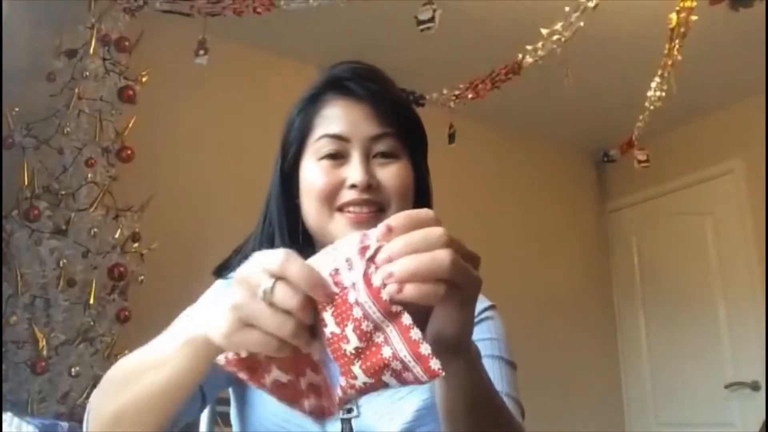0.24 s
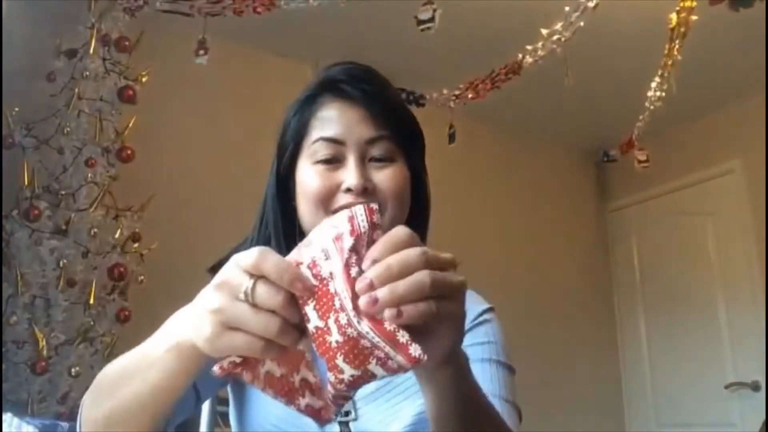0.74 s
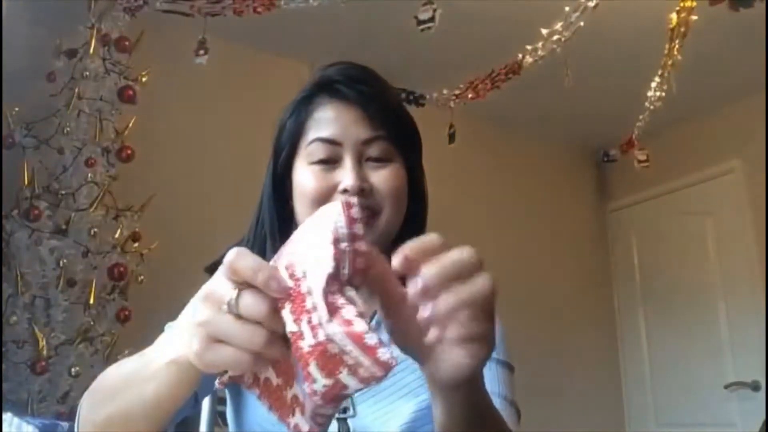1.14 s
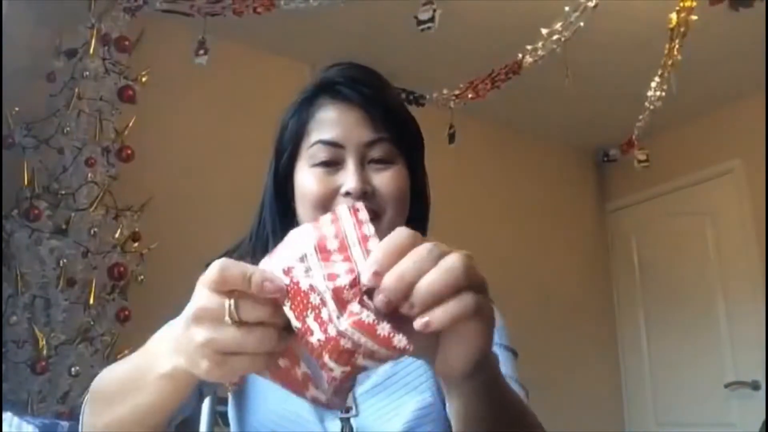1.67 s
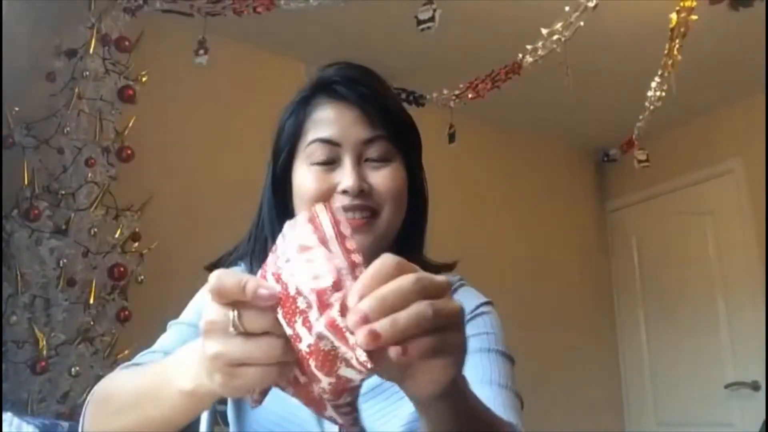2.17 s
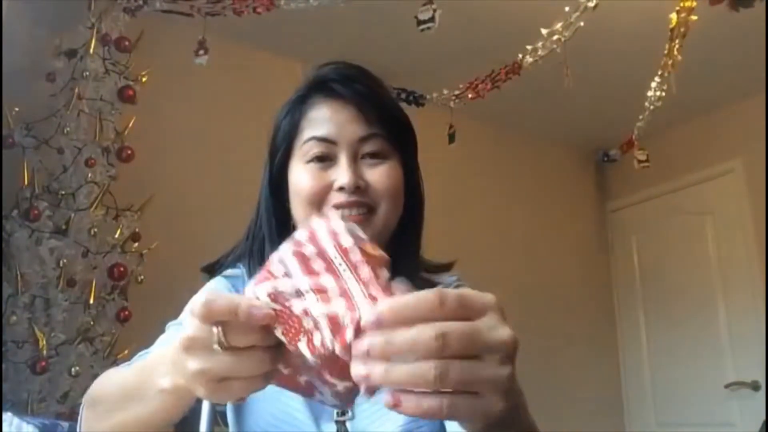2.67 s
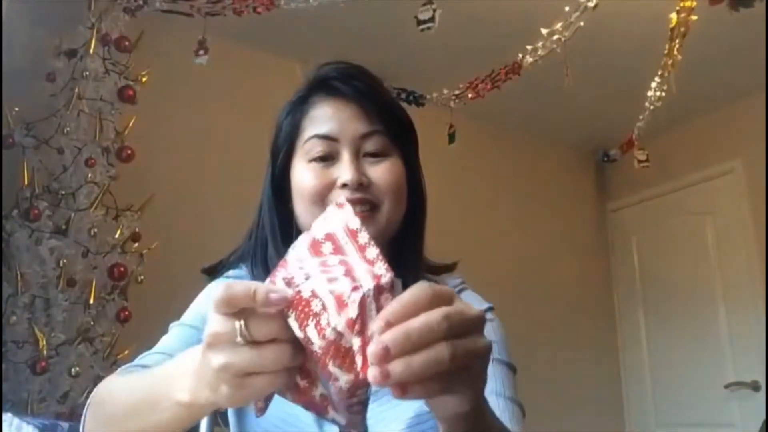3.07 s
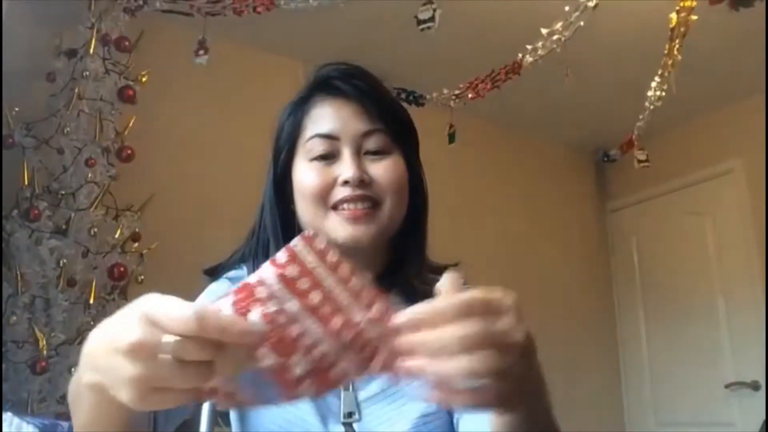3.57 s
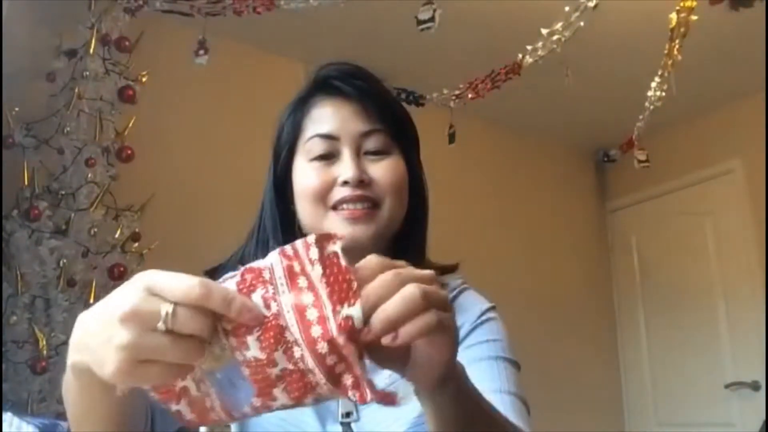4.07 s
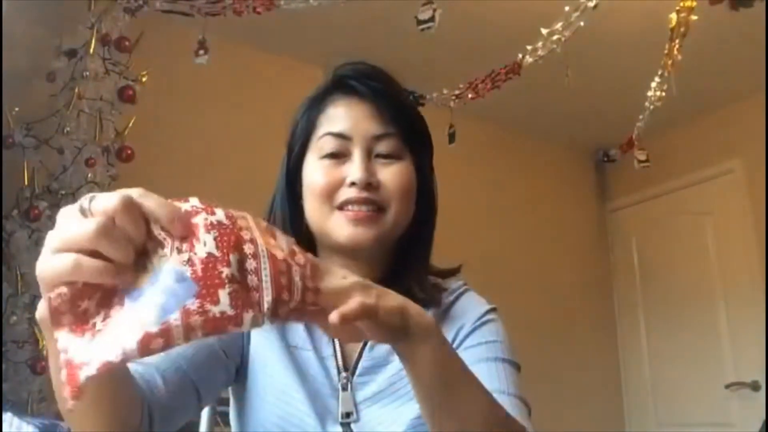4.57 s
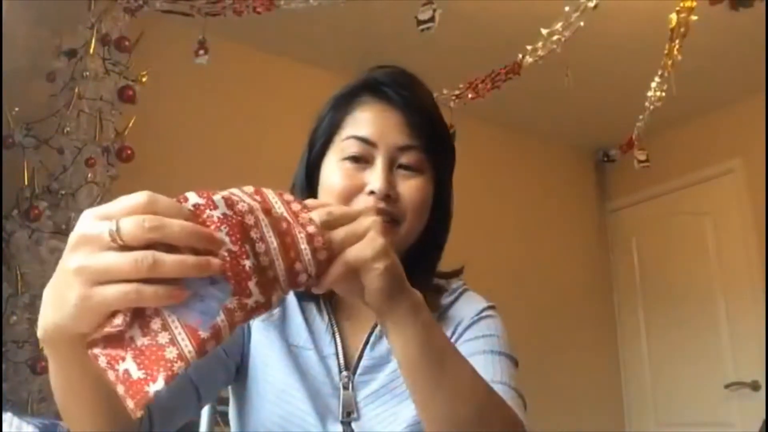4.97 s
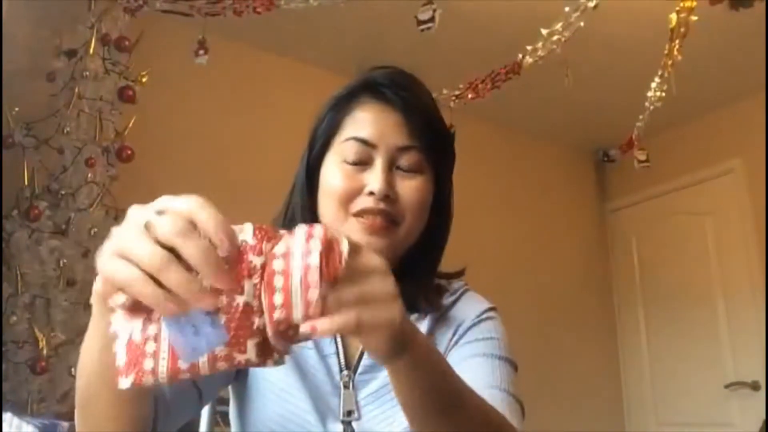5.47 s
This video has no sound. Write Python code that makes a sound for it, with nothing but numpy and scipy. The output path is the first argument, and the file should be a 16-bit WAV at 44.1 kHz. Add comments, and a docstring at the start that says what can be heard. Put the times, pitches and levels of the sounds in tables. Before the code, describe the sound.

Hands pick at, crinkle and briefly tear the wrapping paper of a small soft parcel, close up in a quiet living room.

```python
"""In a living room, close to a phone, two hands pick at, crinkle and rip the wrapping paper of a small soft parcel.
Creases buckle with single snaps and torn fibres go off in quick runs: each is a short push on a damped resonance.
Sliding paper is a dense crackle of tiny slips that follows the hands, with small crinkles popping at random.
Fingers bump the parcel with dull thuds; the walls add echoes and a short tail over a quiet background hush."""
import sys
import numpy as np
from scipy import signal
from scipy.fft import rfft, irfft
from scipy.io import wavfile
from scipy.ndimage import uniform_filter1d

SR = 44100
rng = np.random.default_rng(int(sys.argv[2]) if len(sys.argv) > 2 else 0)


def output_pcm(signal):
    """Save a mono or channel-first signal as 16-bit PCM at the path in sys.argv[1].

    Samples are clipped to [-1, 1] before scaling.
    """
    pcm = np.clip(np.atleast_2d(signal).T, -1, 1) * 32767
    wavfile.write(sys.argv[1], SR, np.round(pcm).astype(np.int16))


N = 252252
T = np.arange(N) / SR
LEAD_S = .003  # a crease starts to creak this long before it gives


# creases that buckle with a clear snap, levels relative to each other:
# (t/s, energy level/dB, f/Hz of the facet, the patch of paper that flips)
CREASE_SNAPS = [(0.0644, -27, 1930), (0.1967, -15, 3670), (0.3525, -4.5, 2720), (0.483, -16, 1460),
                (0.5226, -14, 3440), (0.5476, -14, 2350), (0.591, -20.5, 1310), (0.6082, -18.5, 1860),
                (0.6746, -23.5, 1950), (0.7756, -8, 2130), (0.7884, -13.5, 2000), (0.8523, -14, 2360),
                (0.879, -7.5, 2070), (0.9392, -10, 2220), (0.958, -6.5, 1960), (0.985, -7.5, 1790),
                (1.0458, -10.5, 2420), (1.115, -18.5, 1170), (1.1686, -17, 830), (1.2114, -13.5, 1180),
                (1.255, -11, 2860), (1.2849, -11, 1590), (1.3982, -23, 1340), (1.4807, -9.5, 1910),
                (1.492, -11, 3300), (1.5163, -9, 2210), (1.5887, -18, 2240), (1.6347, -2.5, 3280),
                (1.6624, -0.5, 3870), (1.6659, -2.5, 3500), (1.6867, 2.5, 2670), (1.803, 2.5, 3230),
                (2.0468, -6.5, 1820), (2.177, -13, 1210), (2.1865, -11, 1330), (2.221, -9.5, 1230),
                (2.3346, -14, 1500), (2.3636, -0.5, 2380), (2.3785, -6.5, 2200), (2.4068, -3.5, 2680),
                (2.461, -5, 2660), (2.5171, 1, 2630), (2.5493, -6, 2260), (2.5943, -12, 1050),
                (2.628, -11, 1190), (2.6669, -12.5, 2270), (2.7383, -10, 1940), (2.8036, -6, 2700),
                (2.9331, -3, 1836), (3.1603, -24.5, 1400), (3.2897, -21, 1730), (3.314, -10, 1600),
                (3.3379, -3, 2070), (3.3613, 6.5, 3130), (3.4597, -4.5, 2710), (3.5107, -8.5, 2310),
                (3.5688, -4.5, 2510), (3.6072, -7.5, 3020), (3.7204, -15.5, 2600), (3.7428, -14, 6400),
                (3.8772, -21, 4090), (4.0659, -24, 4180), (4.145, -15, 1940), (4.236, -19, 1740),
                (4.2504, -8.5, 3780), (4.375, -7.5, 3970), (4.4176, 1, 1780), (4.518, -11.5, 1420),
                (4.5586, -5, 2100), (4.579, -8.5, 1170), (4.6575, -2.5, 2360), (4.7289, -8, 2870),
                (4.823, -18, 2220), (4.968, -6, 1490), (5.0867, -20, 1580), (5.1683, -17.5, 1300),
                (5.3426, -7.5, 1430), (5.383, -11.5, 2150), (5.395, -8.5, 2160), (5.5131, -4.5, 1600),
                (5.5665, -9, 1690), (5.6069, -12.5, 1750)]


def snaps(q=1.42, tick=0.61, size=700):
    """Buckling creases: each one lets go with a clear single snap."""
    out = np.zeros(N)
    noises = rng.standard_normal((len(CREASE_SNAPS), size))
    for (s, db, hz), noise in zip(CREASE_SNAPS, noises):
        add(out, s - LEAD_S, undb(db) * snap(hz, noise, q, tick))
    return out


# rips running through the sheet, levels relative to each other:
# (start t/s, length t/s, energy level/dB of a breaking fibre at the start, middle f/Hz)
RIP_RUNS = [(0.323, 0.036, -6.5, 2010), (1.6964, 0.042, 5, 3630), (2.482, .025, -3, 2580),
            (3.363, 0.031, 3.5, 2930)]


def rips(q=1.5, tick=0.48, uneven=0.28, scatter_db=2, octaves=0.18, count=24, size=700):
    """A rip is a quick, nearly regular run of fibres snapping one after another."""
    # fibres break faster as a rip gathers speed, and more weakly as the tension goes
    fibres_per_s, speed_up_per_s2, slacken_db = 260, 3000, 9
    out = np.zeros(N)
    noises = rng.standard_normal((len(RIP_RUNS), count, size))
    for (start, length, db, hz), fibres in zip(RIP_RUNS, noises):
        age = 0  # seconds since the rip began
        for noise in fibres:
            if age > length:
                break
            strength = undb(db - slacken_db * age / length + scatter_db * noise[0])
            fibre_hz = hz * 2 ** (octaves * noise[1])
            add(out, start + age - LEAD_S, strength * snap(fibre_hz, noise[3:], q, tick))
            age += np.exp(uneven * noise[2]) / (fibres_per_s + speed_up_per_s2 * age)
    return out


# how strongly the sheet sends out each pitch of a snap: (f/Hz, level/dB)
SHEET_RADIATION = [(60, -23), (250, 3.5), (450, 6.5), (1200, 3.5), (2200, -2), (4200, -2.5), (5800, -6.5),
                   (8000, -2), (8700, -9.5), (15500, 3)]


def snap(hz, noise, q, tick, shiver_db=-1, shiver_s=0.0012, creak_db=-10, creak_s=0.0015, reach=4.16):
    """A crease creaks for an instant, then flips one facet; the sheet around it shivers for a few milliseconds."""
    t = np.arange(len(noise)) / SR - LEAD_S  # zero at the flip
    after = np.maximum(t, 0)
    shiver = unit(noise * after ** .5 * np.exp(-after / shiver_s))
    creak = unit(noise * np.exp(-abs(t) / creak_s))
    push = undb(shiver_db) * shiver + undb(creak_db) * creak
    push[np.argmin(abs(t))] += 1  # the flip itself
    ring = facet(push, hz, q)
    # big, low facets flip slowly and give little treble
    soft = signal.lfilter(*signal.butter(2, min(reach * hz, SR / 2 - 1), fs=SR), ring)
    return unit(colour((1 - tick) * soft + tick * ring, SHEET_RADIATION))


# relative colour of the sliding sheet, before its three bands are levelled: (f/Hz, level/dB per Hz)
PAPER_COLOUR = [(40, -26.5), (90, -5.5), (180, -0.5), (260, -6), (400, -1.5), (580, -6), (850, -0.5),
                (1500, -3.5), (2500, -3.5), (4000, -8.5), (5800, -15), (8000, -17), (8700, -24),
                (15500, -20.5)]


def rustle(body_db=-3.0, crisp_db=-1, flex_db=-2):
    """Crackle follows the hands; taut paper sounds crisp, and slack paper flexes with a low flutter."""
    flex, body, crisp = hands()
    sheet = colour(crackle(), PAPER_COLOUR)
    edges = [(35, 450), (450, 4500), (4500, 17000)]  # Hz: flexing bass, body, crisp treble
    levels = [flex + flex_db, body + body_db, crisp + crisp_db]
    sliding = np.zeros(N)
    for (lo, hi), db in zip(edges, levels):
        sliding += unit(band(sheet, lo, hi)) * undb(db)
    return np.sqrt(N) * sliding + crinkles(body)


# moves of the hands that slide and crumple the paper, before the fixed trims in rustle():
# (peak t/s, body level/dB, rise t/s, fall t/s, crisp treble level/dB and flexing bass level/dB above the body)
HAND_STROKES = [(0.02, -40.5, 0.14, 0.19, -14.5, -14), (0.287, -27, 0.025, 0.054, -10.5, -15.5),
                (0.346, -29.5, 0.035, 0.016, -2.5, -13), (0.42, -45.5, .05, 0.15, -31, -14),
                (0.55, -44.5, 0.025, 0.048, -37, -16), (0.778, -44.5, 0.047, 0.15, -7, -9),
                (0.996, -29, 0.04, 0.047, -13, -22), (1.21, -47, 0.076, 0.047, -18, -6),
                (1.288, -35.5, 0.026, 0.013, -5, -20), (1.478, -31, 0.012, 0.033, -11, -13.5),
                (1.57, -45.5, 0.055, 0.21, -8, -7.5), (1.722, -17, 0.033, 0.032, -4.5, -18.5),
                (1.812, -28.5, 0.041, 0.058, -26, -24.5), (2.041, -36, 0.043, 0.019, -11, -8),
                (2.183, -32.5, 0.005, 0.012, -9, -14.5), (2.232, -35, 0.032, .045, -18, -15),
                (2.40, -25, 0.034, 0.019, -6.5, -20), (2.497, -20.5, 0.038, 0.026, -6, -21.5),
                (2.68, -40, 0.093, 0.074, -1, -19), (2.80, -30.5, 0.01, 0.0092, 1.5, -18),
                (2.935, -35.5, .04, .025, -8.5, -7), (3.205, -43.5, 0.053, .05, -9.5, -9),
                (3.335, -21, 0.011, 0.06, -7, -30), (3.376, -23.5, 0.028, 0.034, 0, -9),
                (3.472, -30, 0.048, 0.036, -6.5, -25), (3.596, -35.5, 0.061, 0.063, -2.5, -17),
                (3.75, -41.5, 0.02, 0.048, -4.5, -16), (3.82, -59, 0.042, 0.1, -27, -7),
                (4.113, -41, 0.0078, 0.047, -12, -11), (4.249, -38, 0.074, 0.07, -6.5, -11),
                (4.418, -27, 0.034, 0.02, -10, -10), (4.514, -31.5, 0.026, 0.039, -7, -13),
                (4.59, -29.5, 0.07, 0.035, -9.5, -9.5), (4.654, -20.5, 0.011, 0.0086, -11.5, -11.5),
                (4.713, -24, 0.051, 0.064, -7.5, -15), (4.82, -31, .02, 0.031, -7, -8.5),
                (4.964, -36.5, 0.071, 0.089, -5.5, -15), (5.10, -48.5, 0.11, 0.068, -16, -2),
                (5.28, -38.5, 0.084, 0.052, -8.5, -11.5), (5.353, -37.5, 0.02, 0.035, -15, -3),
                (5.395, -36.5, 0.024, 0.019, -6, -8), (5.504, -28.5, 0.061, 0.056, -7, -13),
                (5.644, -34, 0.049, 0.03, -13, -18.5), (5.715, -37.5, 0.038, .05, -13, -28)]


def hands():
    """Overlapping strokes add up to the levels (dB) of the paper's flexing bass, body and crisp treble."""
    shape = 1.37  # power of the elapsed time in each swell
    power = np.full((3, N), 1e-10)
    for s, db, rise, fall, crisp, flex in HAND_STROKES:
        distance = np.maximum((s - T) / rise, (T - s) / fall)
        swell = np.exp(-distance ** shape)
        power += np.outer(undb([db + flex, db, db + crisp]) ** 2, swell ** 2)
    return 10 * np.log10(power)


def crackle(rate=5000, spread_db=3.5, cap_db=15, q=1.86, rub_db=-10, tick=0.48,
            catch_db=3.0, catch_rate=110, wander_rate=70, count=12):
    """Countless tiny slips of unequal size, each on a facet with one of several pitches, over a smooth rub."""
    happens = rng.random(N) < rate / SR  # rate in slips per second
    which = rng.integers(0, count, N)
    size_db = np.minimum(spread_db * rng.exponential(size=N), cap_db)
    slips = happens * undb(size_db) * rng.choice([-1, 1], N)
    wander_db = 2.5
    facets = np.zeros(N)
    # the strain wanders from facet to facet, so the colour keeps changing
    for k, hz in enumerate(np.geomspace(350, 13000, count)):
        strain = undb(wander_db * walk(wander_rate))
        facets += facet(slips * (which == k) * strain, hz, q)
    rub = unit(rng.standard_normal(N))
    sound = unit(facets) + tick * unit(slips) + undb(rub_db) * rub
    # the sheet catches and lets go, so the crackle comes in clumps
    return sound * undb(catch_db * walk(catch_rate))


def crinkles(hand_db, centre_hz=1600, count=420, size=700):
    """Slack creases pop at random, each ringing briefly at its own pitch, more often and harder as hands work harder."""
    busy_db = -42  # from this hand level up, every possible pop happens
    pop_db, follow, spread_db, most_db = -20, .6, 3.5, -10  # follow: dB of pop per dB of effort
    octaves, q = .65, 5
    out = np.zeros(N)
    draws, noises = rng.random((count, 2)), rng.standard_normal((count, size))
    for (when, luck), noise in zip(draws, noises):
        effort_db = hand_db[int(when * N)] - busy_db
        if luck < undb(effort_db):
            db = min(pop_db + follow * effort_db + spread_db * noise[0], most_db)
            hz = centre_hz * 2 ** (octaves * noise[1])
            add(out, when * N / SR, undb(db) * snap(hz, noise[2:], q, 0))
    return out


# fingers bumping the parcel: (t/s, peak level/dB, f/Hz, t/s for the padding to fade by 60 dB)
FINGER_BUMPS = [(.325, -36, 110, .04), (0.774, -31.5, 149, 0.017), (1.284, -30.5, 160, 0.03),
                (2.497, -24, 85, 0.064), (2.9318, -17.5, 180, 0.026), (2.9744, -25, 400, .025),
                (4.114, -34, 100, 0.046), (4.414, -30, 140, 0.053), (4.578, -33, 130, .03),
                (4.659, -32, 140, 0.035), (5.125, -31, 380, .04)]


def bumps(width=2.7, size=6000):
    """The soft parcel gives a dull, quickly damped thud without a clear pitch."""
    out, t = np.zeros(N), np.arange(size) / SR
    noises = rng.standard_normal((len(FINGER_BUMPS), size))
    for (s, db, hz, t60), noise in zip(FINGER_BUMPS, noises):
        push = unit(facet(1. * (t == 0), hz, 1))
        fade = np.exp(-np.log(1000) * t / t60)
        padding = unit(band(noise, hz / width, hz * width, order=2) * fade)
        thud = push + padding
        add(out, s, undb(db) * thud / abs(thud).max())
    return out


# how long the room's tail takes to fade by 60 dB: (f/Hz, t/s)
WALL_FADES = [(150, 0.79), (500, 0.3), (1500, 0.41), (4000, 0.33), (8000, 0.47), (15000, 0.32)]


def room(x, early_db=-12, early_s=0.0062, tail_db=-13, gap_s=0.0046, lowest_hz=130, count=9):
    """Near surfaces return quick echoes; the walls a diffuse tail that lasts longest in the bass."""
    t = T[:SR]
    edges = np.geomspace(lowest_hz, 18000, count + 1)
    tail = np.zeros(SR)
    for lo, hi in zip(edges, edges[1:]):
        t60 = lookup(WALL_FADES, np.sqrt(lo * hi))
        tail += band(rng.standard_normal(SR), lo, hi) * np.exp(-np.log(1000) * t / t60)
    echoes = rng.random(SR) < 1500 / SR  # 1500 per second on average
    early = rng.standard_normal(SR) * echoes * np.exp(-t / early_s)
    early = undb(early_db) * unit(early * (t > gap_s / 2))
    late = undb(tail_db) * unit(tail * (t > gap_s))
    return signal.fftconvolve(x, early + late)[:N]


# relative colour of the quiet background: (f/Hz, level/dB per Hz)
HUSH_COLOUR = [(30, 3.5), (90, 2.5), (300, -3.5), (1500, -11), (5000, -28.5), (16000, -29.5)]


def hush(level_db=-65.5):
    """Steady background: random noise, coloured and set to one average level."""
    return undb(level_db) * np.sqrt(N) * unit(colour(rng.standard_normal(N), HUSH_COLOUR))


def undb(db):
    """Decibels to gain."""
    return 10 ** (np.asarray(db) / 20)


def unit(x):
    """Scale to an energy of one."""
    return x / np.sqrt(np.sum(x ** 2))


def add(track, s, sound):
    """Mix a sound into the track at time s (seconds)."""
    i = max(int(s * SR), 0)
    part = sound[:max(N - i, 0)]
    track[i:i + len(part)] += part


def lookup(points, hz):
    """Read a table of (f/Hz, value) on a log-frequency axis."""
    f, value = np.transpose(points)
    return np.interp(np.log(np.maximum(hz, 1)), np.log(f), value)


def colour(x, points, size=2048):
    """Filter with the given (f/Hz, level/dB) response, never sounding before its input."""
    cepstrum = irfft(np.log(undb(lookup(points, np.fft.rfftfreq(size, 1 / SR)))))
    # folding the cepstrum forward gives the minimum-phase filter
    cepstrum[1:size // 2] *= 2
    cepstrum[size // 2 + 1:] = 0
    return signal.fftconvolve(x, irfft(np.exp(rfft(cepstrum))))[:len(x)]


def band(x, lo_hz, hi_hz, order=3):
    """Keep only the pitches between two limits."""
    limits = [lo_hz, min(hi_hz, SR / 2 - 1)]
    return signal.sosfilt(signal.butter(order, limits, "band", fs=SR, output="sos"), x)


def facet(x, hz, q):
    """One damped resonance, such as a patch of paper; a higher q rings longer."""
    w = 2 * np.pi * min(hz, SR / 2 - 1) / SR
    a = np.sin(w) / (2 * q)
    return signal.lfilter([a, 0, -a], [1 + a, -2 * np.cos(w), 1 - a], x)


def walk(rate):
    """Smooth random wander with a spread near one, with a new target rate times a second."""
    k = max(int(SR / rate), 1)
    steps = np.repeat(rng.standard_normal(N // k + 1), k)
    return np.sqrt(N) * unit(uniform_filter1d(steps, k)[:N])


def scene(snap_db=3.0, bump_room_db=-6):
    """Paper and parcel in the quiet room; the small padded parcel stirs the walls only a little."""
    paper = undb(snap_db) * (snaps() + rips()) + rustle()
    thuds = bumps()
    echoes = room(paper + undb(bump_room_db) * thuds)
    return (paper + thuds + echoes + hush())[None]


def record(dry):
    """The phone thins the deepest bass, clips at full scale and cuts the top."""
    thin = signal.sosfilt(signal.butter(2, 40, "high", fs=SR, output="sos"), dry)
    top_cut = signal.ellip(10, .2, 80, 16000, fs=SR, output="sos")  # 16000 Hz
    return signal.sosfilt(top_cut, np.clip(thin, -1, 1))


dry = scene()
out = record(dry)
output_pcm(out)
```